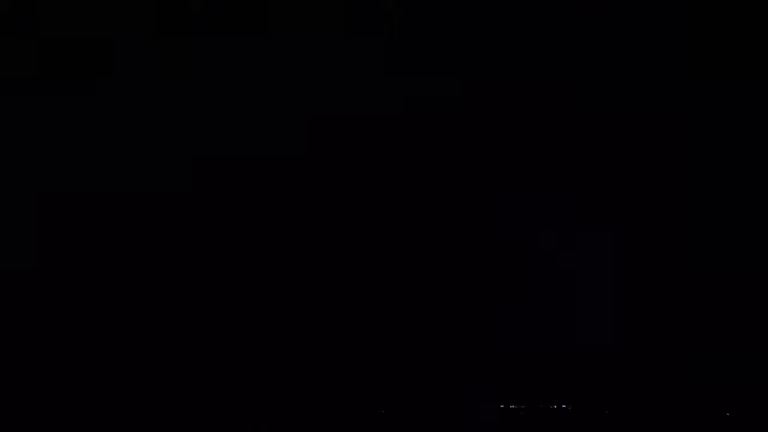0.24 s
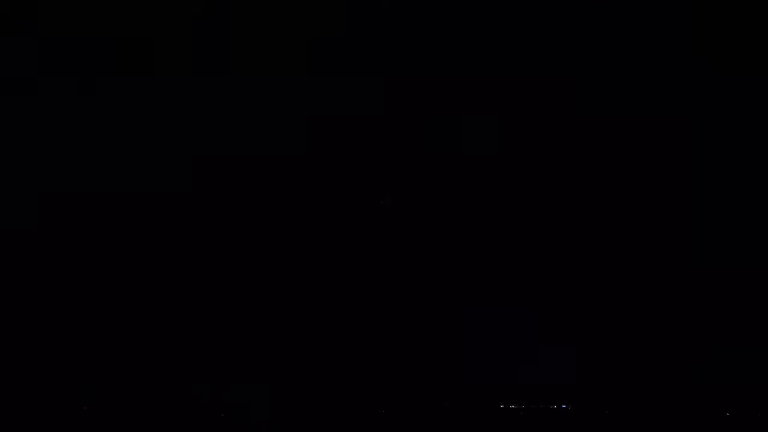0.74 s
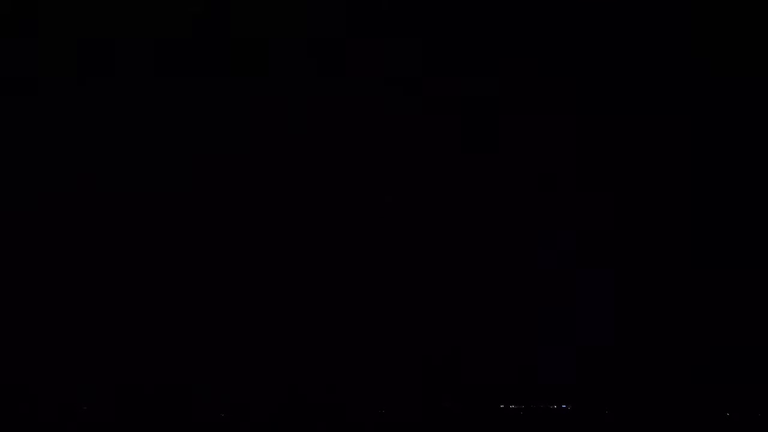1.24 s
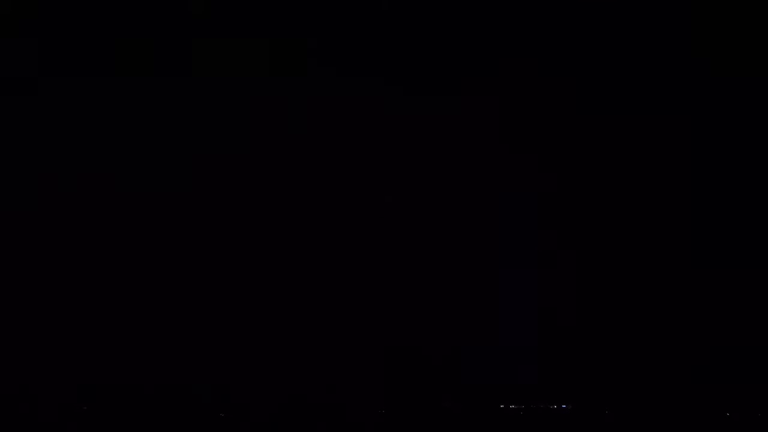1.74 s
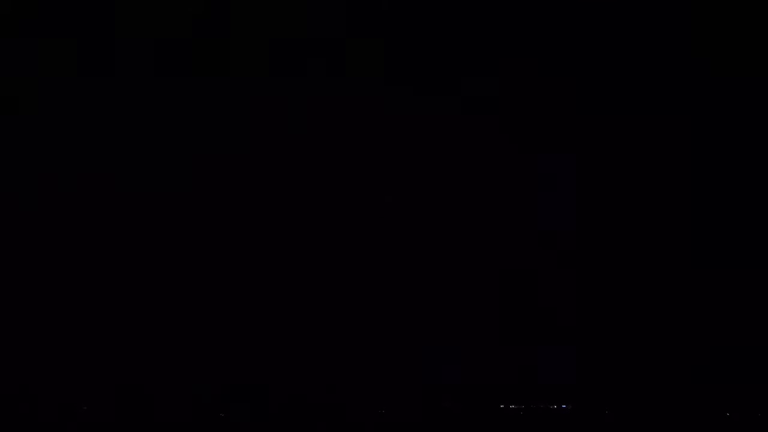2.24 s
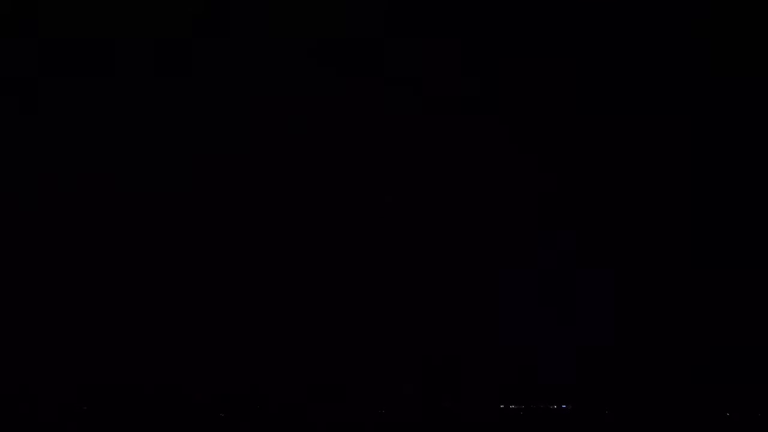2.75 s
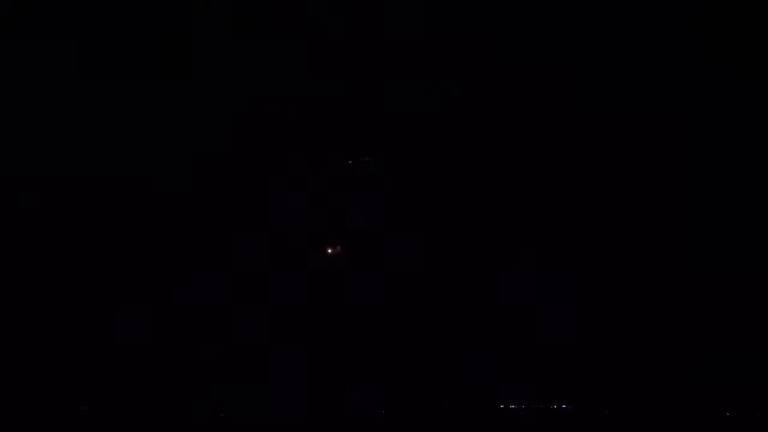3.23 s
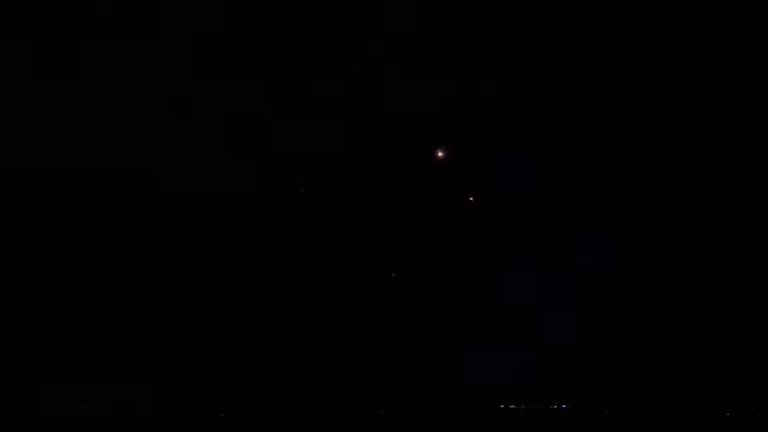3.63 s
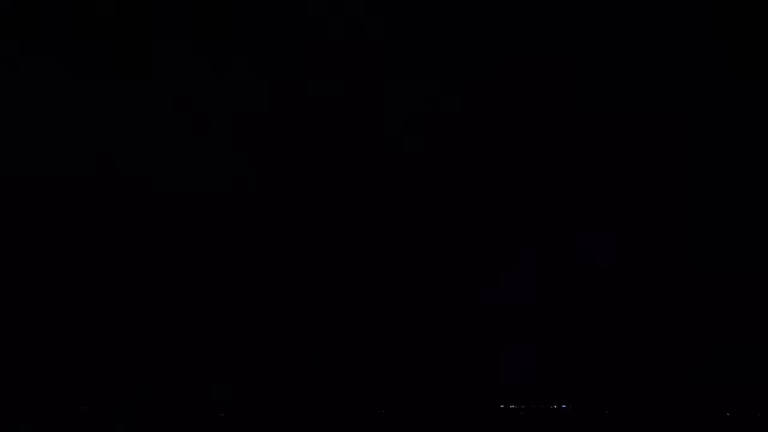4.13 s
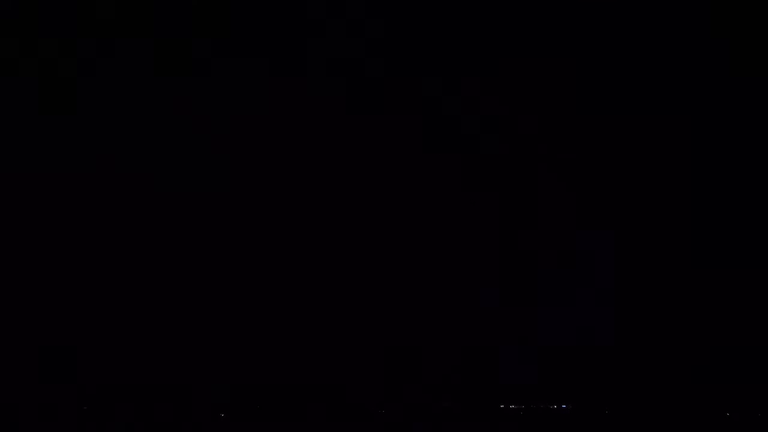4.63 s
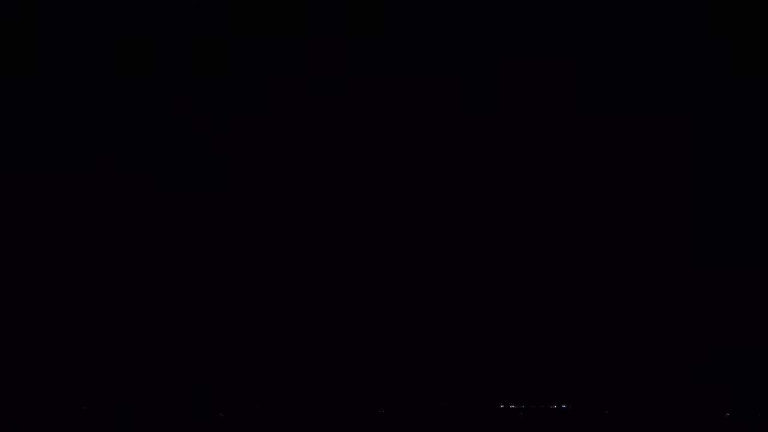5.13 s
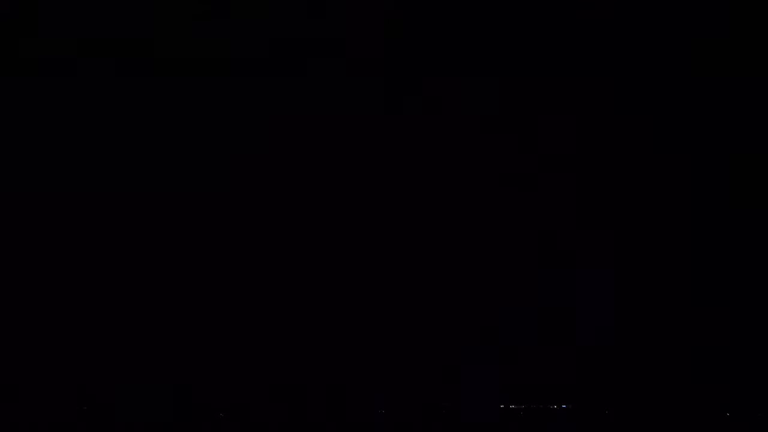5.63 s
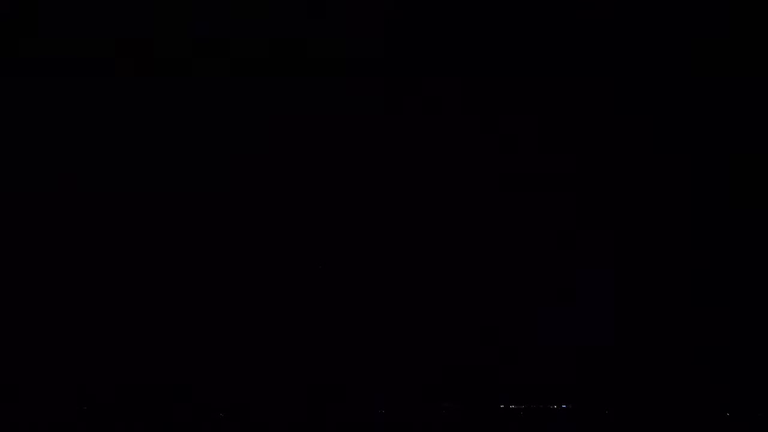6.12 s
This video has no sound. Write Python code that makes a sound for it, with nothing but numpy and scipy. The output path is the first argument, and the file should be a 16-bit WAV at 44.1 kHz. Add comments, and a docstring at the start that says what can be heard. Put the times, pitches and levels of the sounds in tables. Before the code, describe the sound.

Fireworks over open land: nearly two seconds of quiet rumble, tiny ticks and far thuds, then one overloaded, chest-deep report. Its echoes return in heavy slaps and leafy swishes, fading into long low thunder. About ten smaller, drier cracks follow in irregular clusters, slightly left of centre, before muffled pops and distant bass remain over faint recorder hiss.

```python
"""Fireworks over open country at night

One heavy shell overloads the recorder and rolls round the land, then a string of small salutes cracks.
Each is a damped pressure swing that arrives straight, glances off something near and bounces off the ground.
Shaped noise gives the scatter from trees and land. Far mortars thud, far pops and dull late echoes of the
salutes follow the same blast law, small ticks sound close by, and a low rumble, a murk of far echoes,
faint hiss and whine lie beneath."""
import sys
import numpy as np
from scipy import signal
from scipy.fft import rfft, irfft
from scipy.io import wavfile
from scipy.ndimage import uniform_filter1d, map_coordinates

SR = 44100
rng = np.random.default_rng(int(sys.argv[2]) if len(sys.argv) > 2 else 0)


def unload_wav(signal):
    """Save mono or channel-first audio to the path in sys.argv[1] as 16-bit WAV at rate SR, clipped to [-1, 1]."""
    wavfile.write(
        sys.argv[1],
        SR,
        np.round(np.clip(np.atleast_2d(signal).T, -1, 1) * 32767).astype(np.int16),
    )


N = 280917
TIME = np.arange(N) / SR

# spectrum of the murk of far echoes: (frequency [Hz], relative density [dB])
TOWN_COLOUR = [(60, 6.5), (160, -10), (240, 8), (310, -4.5), (365, 0.5), (480, -6), (650, -10.5),
               (1100, -18.5), (1400, -22), (1800, -20), (2300, -40), (6000, -38)]
# murk of far echoes: (time [s], level [dB])
TOWN_LEVEL = [(0, -61), (.3, -57), (.7, -58), (1.1, -62.5), (1.8, -63), (4.2, -57.5), (6.37, -59)]
# recorder hiss spectrum: (frequency [Hz], relative density [dB])
HISS_COLOUR = [(100, 9), (3500, 0.5), (3950, 7), (4400, 1.5), (6000, 0), (14000, -0.5), (16000, -2.5)]
# faint electrical whine: (frequency [Hz], rms level [dB])
WHINE = [(4000, -84.5), (6002, -88), (10002, -89)]
# bass spectra of the heavy shell and of distant shells: (frequency [Hz], relative density [dB])
BOOM_COLOUR = [(12, -6), (25, -8), (50, 1), (80, 2), (110, -6.5), (150, -18), (250, -24.5), (600, -70)]
FAR_COLOUR = [(12, -30), (22, 2.5), (52, 3), (85, -3.5), (125, -13.5), (170, -24), (250, -38), (600, -64)]
# bass swells of distant shells and mortars: (start [s], level before build-up [dB], fall [dB/s])
FAR_BOOMS = [(.03, -44, 60), (.36, -49, 30), (0.646, -40, 57), (.89, -49, 79), (3.57, -39, 71),
             (4.55, -31.5, 37), (5.86, -49, 4)]
# dry ticks and faint swishes close by: (centre [s], level [dB], frequency [Hz], band width [Hz], 1/e length [s])
TICKS = [(0.322, -62, 3010, 3500, 0.0036), (0.335, -66, 4700, 1500, 0.004), (0.426, -73, 4030, 120, 0.041),
         (.60, -76, 1730, 300, 0.05), (1.199, -70, 1586, 800, 0.026), (1.228, -58.5, 1800, 500, 0.0044),
         (2.869, -63, 4550, 1500, 0.0048), (2.89, -73, 4600, 900, .012), (5.72, -67, 5870, 3004, 0.0054),
         (5.756, -65, 5600, 2516, .003)]
# mortar launches, far pops and dull late echoes of the salutes:
# (time [s], level before air filter [dB], blast pitch [Hz], air cut-off [Hz])
THUDS = [(.642, -42, 201, 1000), (0.6579, -34.5, 131, 1000), (0.674, -35.5, 45, 120),
         (.750, -46, 1100, 1000), (1.238, -41.5, 796, 900), (1.324, -45, 400, 800),
         (1.468, -47.5, 400, 800), (4.597, -18, 69, 121), (5.432, -29.5, 447, 600), (5.528, -29, 446, 520),
         (5.806, -43, 454, 900), (5.899, -39, 297.5, 900), (5.909, -35, 250, 752), (6.225, -41.5, 400, 595)]
# salutes: (time [s], level before air filter [dB], blast pitch [Hz], air cut-off [Hz],
#           ground delay [ms], ground level before low-pass [dB], damping [0-1])
SALUTES = [(4.2877, -8.5, 444, 4360, 6.53, 1.5, .95), (4.5150, -5, 252, 3100, 4.93, -2.5, 0.44),
           (4.7335, -5, 406, 2520, 5.74, 0, 0.98), (4.7720, -6.5, 280, 5600, 4.4, 1.5, 0.67),
           (4.7979, -9, 250, 2720, 5.8, -1.5, 0.93), (4.8181, -11.5, 390, 2700, 5.67, -6, 0.29),
           (4.8245, -7, 245, 4330, 5.7, 0, 0.7), (4.9703, -9, 266, 3060, 6.6, 1, 1),
           (5.0064, -10, 258, 4800, 6.7, 3, 0.7), (5.1928, -8, 230, 3500, 6.55, 1.5, 0.93)]
# answer of close ground, nearer bushes and far land: (level before build-up [dB], fall [dB/s])
LAND_DECAY = [(-31, 1400), (-46, 145), (-69.5, 6.5)]
# heavy shell off large faces of the land:
# (time [s], level before air filter [dB], blast pitch [Hz], air cut-off [Hz])
SLAPS = [(1.872, -11, 117.3, 227), (1.9676, -14.5, 82, 160), (1.995, -10, 71.5, 220),
         (2.006, -14.5, 71, 500), (2.022, -11.5, 62, 400), (2.055, -23.5, 202, 2500),
         (2.1141, -6.5, 78, 377), (2.1236, -8, 72, 240), (2.295, -16, 70, 200), (2.657, -19.5, 58.3, 147),
         (2.795, -21.5, 61.3, 149), (2.867, -27, 193, 900), (2.885, -20, 59, 150),
         (3.117, -24.5, 80.6, 200), (3.278, -27, 64.4, 199)]
# heavy shell off tree lines: (time [s], 1/e length [s], roar of trunks [dB], hiss of leaves [dB])
TREE_ECHOES = [(1.892, 0.018, -37, -48), (2.038, 0.048, -35, -46), (2.13, 0.031, -33.5, -57),
               (2.267, 0.071, -45, -51), (2.76, 0.09, -72, -54), (3.037, 0.16, -58, -63),
               (4.05, .09, -59.5, -72)]
# near land then far land, for the bass and for the roll: (level before build-up [dB], fall [dB/s])
BOOM_DECAY = [(-21.5, 18), (-31.5, 5.5)]
ROLL_DECAY = [(-34.5, 24.6), (-47.5, 5.45)]
# spectrum of the heavy shell's roll: (frequency [Hz], relative density [dB])
ROLL_COLOUR = [(60, 4), (150, 3.5), (260, 8), (400, 4), (750, -2.5), (1200, -6), (2000, -14.5),
               (4000, -21.5), (8000, -34), (16000, -74)]
# further scatter spectra: (frequency [Hz], relative density [dB])
THUD_TAIL_COLOUR = [(100, -4.0), (2000, 14), (8000, -20.0)]
LAND_COLOUR = [(60, -7), (160, 1), (350, 3), (620, 5.5), (1050, 3.5), (1800, -2), (4000, -1.5), (12000, 0)]
SALUTE_LEAF_COLOUR = [(700, 0), (2500, -14), (6000, 3), (9500, 5), (14000, -3)]
NEAR_COLOUR = [(150, -2), (500, 12.5), (2000, -4), (6000, -20.5), (15000, -32)]
TREE_BODY_COLOUR = [(50, -7), (110, 8), (190, 5), (300, -14), (600, -38), (2000, -84)]
SHELL_LEAF_COLOUR = [(300, 5), (1000, -0.5), (2000, -4), (5000, -13.0), (9000, -17.5), (15000, -25)]

SHELL_S = 1.8540  # burst of the heavy shell
BOOM_BUILD_S, ROLL_BUILD_S = 0.045, 0.12
FAR_BUILD_S, FAR_FLOOR_DB = 0.0097, -56
# a belt of trees returns each salute once more
BELT_DELAY_S, BELT_SPREAD_S, BELT_DB = 0.2, 0.11, -56.5
SALUTE_LAG_S = 0.000014  # the salutes burst to the left, so the right port hears them this much later
TOP_HZ = 15800  # upper edge of the recorder's band


def undb(db):
    """Level: an amplitude ratio is ten to the power of decibels over twenty."""
    return 10 ** (np.asarray(db) / 20)


def curve(rows):
    """Envelope: gain follows straight lines in decibels between (time, level) points."""
    return undb(np.interp(TIME, *np.transpose(rows)))


def lowpass(x, hz, order=2):
    """Absorption: a causal Butterworth filter weakens what lies above its cut-off."""
    cutoff = min(hz, SR / 2 - 100)
    return signal.sosfilt(signal.butter(order, cutoff, fs=SR, output="sos"), x)


def delay(x, s):
    """Propagation delay: the same wave arrives s seconds later on the full time line."""
    silence = np.zeros(max(int(round(s * SR)), 0))
    return np.concatenate([silence, x, np.zeros(N)])[:N]


def noise(colour, wide_hz):
    """Diffuse field: shaped stereo noise of rms 1 whose ports agree well below wide_hz."""
    f = np.arange(N // 2 + 1) * SR / N + 1e-3  # offset avoids log(0)
    hz, db = np.transpose(colour)
    spectrum = undb(np.interp(np.log(f), np.log(hz), db))
    mid, side = rfft(rng.standard_normal((2, N))) * spectrum
    width = np.tanh(f / wide_hz)
    ports = np.array([mid + width * side, mid - width * side]) / np.sqrt(1 + width ** 2)
    x = irfft(ports, N)
    return x / x.std()


def patches(rate, spread_db):
    """Uneven scattering: reflectors return sound in clumps, here rate random gains a second, of rms 1."""
    knots = np.arange(0, TIME[-1], 1 / rate)
    wander = np.interp(TIME, knots, rng.standard_normal(len(knots)))
    gain = undb(spread_db * wander)
    return gain / np.sqrt(np.mean(gain ** 2))


def even(x):
    """Power normalization: dividing by the running rms flattens slow chance swells."""
    power = uniform_filter1d(np.mean(x ** 2, axis=0), size=SR // 8)
    return x / np.sqrt(power)


def decay(start, stages, build_s):
    """Reverberation: echo power builds after start and falls as a sum of exponential stages."""
    age = np.maximum(TIME - start, 0)
    power = sum(undb(db - fall * age) ** 2 for db, fall in stages)
    return np.sqrt(power) * (1 - np.exp(-age / build_s))


def swell(s, length, db):
    """Distributed reflection: a spread-out reflector gives a bell-shaped gain, strongest at s."""
    return undb(db) * np.exp(-((TIME - s) / length) ** 2)


def air(x, start, loss_db):
    """Air absorption: treble falls by loss_db per kHz for each second travelled since start."""
    f, t, z = signal.stft(x, SR, nperseg=256)
    loss = loss_db * np.outer(f / 1000, np.maximum(t - start, 0))
    return signal.istft(z * undb(-loss), SR)[1][:, :N]


def blast(db, hz, air_hz, damping):
    """Damped oscillation: a shock front swings from overpressure to suction; air rounds the front."""
    phase = 2 * np.pi * hz * TIME[:SR // 8]
    d = min(damping, .95)
    swing = np.sqrt(1 - d * d)
    wave = np.exp(-d * phase) * (np.cos(swing * phase) - d / swing * np.sin(swing * phase))
    return undb(db) * lowpass(wave, air_hz)


def burst(s, db, hz, air_hz, ground_ms, ground_db, damping, ground_hz):
    """Multipath: the direct blast, a weak glance off something near, and a duller ground bounce add."""
    wave = blast(db, hz, air_hz, damping)
    glance = delay(undb(-14.5) * lowpass(wave, 3100), s + 0.00271)
    ground = delay(undb(ground_db) * lowpass(wave, ground_hz, order=1), s + ground_ms / 1000)
    arrivals = delay(wave, s) + glance + ground
    # a surface right by the microphone doubles each front, which hollows the sound near 2 kHz
    return 0.88 * arrivals + 0.26 * delay(arrivals, 0.00027)


def town():
    """Diffuse background: many far echoes merge into uneven coloured noise."""
    return noise(TOWN_COLOUR, wide_hz=2980) * curve(TOWN_LEVEL) * patches(15, spread_db=1.0)


def rumble():
    """Low-frequency propagation: bass carries furthest, so the shell's boom and distant shells roll on."""
    boom = even(noise(BOOM_COLOUR, wide_hz=3950)) * patches(18, spread_db=2.5)
    boom = boom * decay(SHELL_S, BOOM_DECAY, BOOM_BUILD_S)
    swells = sum(decay(s, [(db, fall)], FAR_BUILD_S) ** 2 for s, db, fall in FAR_BOOMS)
    far_power = undb(FAR_FLOOR_DB) ** 2 + swells
    far = even(noise(FAR_COLOUR, wide_hz=4000)) * np.sqrt(far_power)
    return boom + far


def ticks():
    """Amplitude modulation: low noise on a carrier makes a narrow band, in a short bell-shaped swell."""
    t = TIME[:SR // 5]
    centre = t.mean()
    out = 0
    for s, db, hz, width_hz, length in TICKS:
        band = lowpass(rng.standard_normal(len(t)), width_hz / 2)
        grain = band * np.cos(2 * np.pi * hz * t)
        envelope = np.exp(-((t - centre) / length) ** 2)
        out = out + delay(undb(db) * grain / grain.std() * envelope, s - centre)
    return out


def far_thuds():
    """Scattering by convolution: each launch, far pop or late salute echo excites a short noisy tail."""
    thuds = sum(delay(blast(db, hz, air_hz, damping=0.37), s) for s, db, hz, air_hz in THUDS)
    tail = noise(THUD_TAIL_COLOUR, wide_hz=4000) * undb(-27.5) * np.exp(-TIME / 0.014)
    return thuds + signal.fftconvolve(thuds[None], tail[:, :SR // 2], axes=1)[:, :N]


def salutes():
    """Impulse response: small shells crack, and each blast excites a grainy land tail and a leaf sizzle."""
    left = sum(burst(*row, ground_hz=710) for row in SALUTES)
    right = map_coordinates(left, [(TIME - SALUTE_LAG_S) * SR], mode="nearest")
    # the land is struck by the bare blast wave
    waves = sum(delay(blast(db, hz, air_hz, damping), s) for s, db, hz, air_hz, _, _, damping in SALUTES)
    belt = swell(BELT_DELAY_S, BELT_SPREAD_S, BELT_DB)
    answer = np.hypot(decay(0, LAND_DECAY, build_s=0.000093), belt)
    land = noise(LAND_COLOUR, wide_hz=2330) * patches(400, spread_db=1.0) * answer
    land = air(land, 0, loss_db=0.5)
    leaves = noise(SALUTE_LEAF_COLOUR, wide_hz=1500) * undb(-41.5) * np.exp(-TIME / 0.026)
    response = land + leaves * patches(520, spread_db=6)
    return np.array([left, right]) + signal.fftconvolve(waves[None], response, axes=1)[:, :N]


def heavy_shell():
    """Blast and reverberation: a big report, near scatter, discrete slaps and a roll that grows dull."""
    age = np.maximum(TIME - SHELL_S, 0)
    report = burst(SHELL_S, db=5.0, hz=81, air_hz=13900, ground_ms=5.74, ground_db=-4,
                   damping=0.31, ground_hz=370)
    near = noise(NEAR_COLOUR, wide_hz=2930) * undb(-17.0) * np.exp(-age / 0.0085)
    slaps = sum(delay(blast(db, hz, air_hz, damping=0.21), s) for s, db, hz, air_hz in SLAPS)
    trunk_gain = sum(swell(s, length, db) for s, length, db, _ in TREE_ECHOES)
    leaf_gain = sum(swell(s, length, db) for s, length, _, db in TREE_ECHOES)
    scatter = noise(ROLL_COLOUR, wide_hz=2500) * patches(130, spread_db=1.0)
    roll = scatter * np.hypot(decay(SHELL_S, ROLL_DECAY, ROLL_BUILD_S), trunk_gain)
    # each tree line also throws back the deep body of the blast
    body = noise(TREE_BODY_COLOUR, wide_hz=2500) * undb(1.0) * trunk_gain
    # leaves and twigs send back mostly the sharp front, so these echoes hiss
    leaves = noise(SHELL_LEAF_COLOUR, wide_hz=2100) * leaf_gain
    echoes = near + body + air(roll + leaves, SHELL_S, loss_db=0.53)
    return report + slaps + (TIME > SHELL_S) * echoes


def scene():
    """Superposition: the pressures of the background and all the reports add."""
    return town() + rumble() + ticks() + far_thuds() + salutes() + heavy_shell()


def record(dry):
    """Transduction: unequal ports, then added hiss and whine, clipping, and a limited band."""
    bass = 0.11 * lowpass(dry, 2500, order=1)
    left = dry[0] - bass[0]
    # an all-pass filter makes the right port three quarters of a sample later
    right = signal.lfilter([.15, 1], [1, .15], dry[1] + bass[1])
    hiss = undb(-66.0) * noise(HISS_COLOUR, wide_hz=100)
    whine = sum(undb(db) * np.sqrt(2) * np.sin(2 * np.pi * hz * TIME) for hz, db in WHINE)
    clipped = np.clip(np.array([left, right]) + hiss + whine, -.99, .99)
    return signal.sosfilt(signal.ellip(8, .1, 70, TOP_HZ, fs=SR, output="sos"), clipped)


dry = scene()
out = record(dry)
unload_wav(out)
```